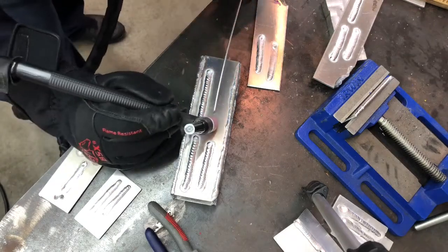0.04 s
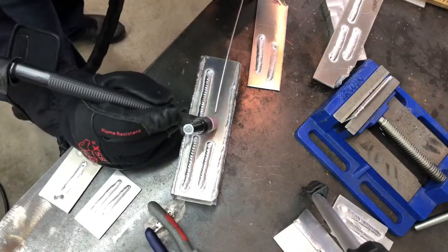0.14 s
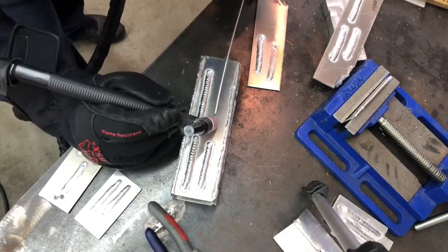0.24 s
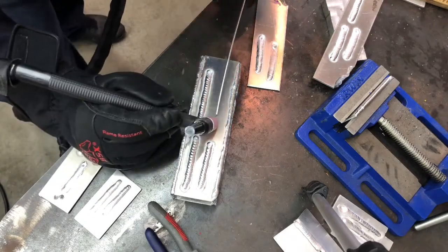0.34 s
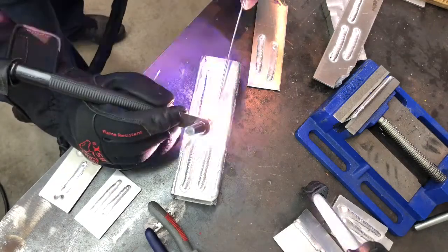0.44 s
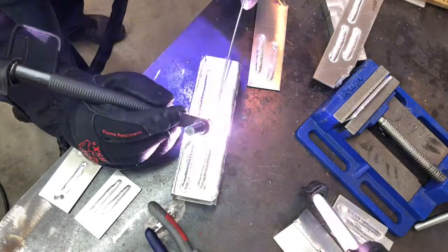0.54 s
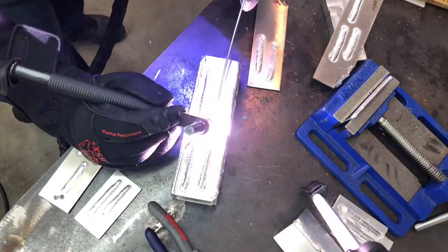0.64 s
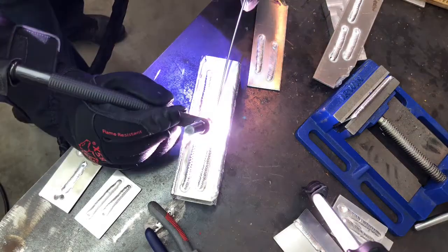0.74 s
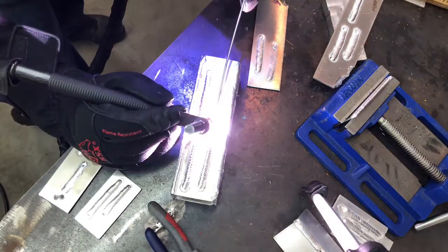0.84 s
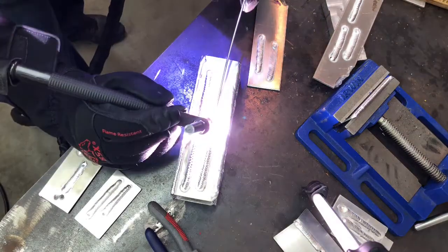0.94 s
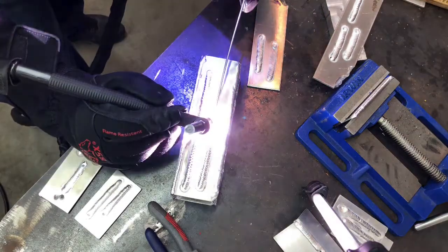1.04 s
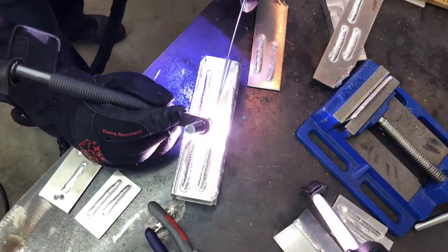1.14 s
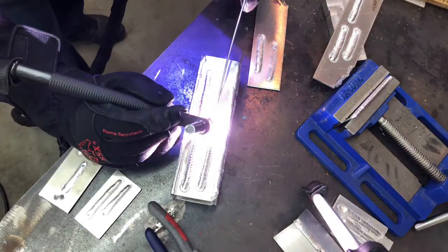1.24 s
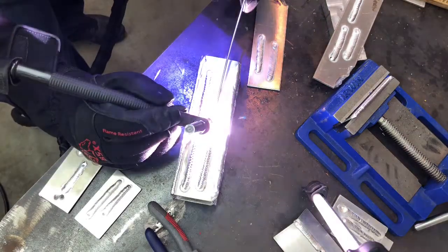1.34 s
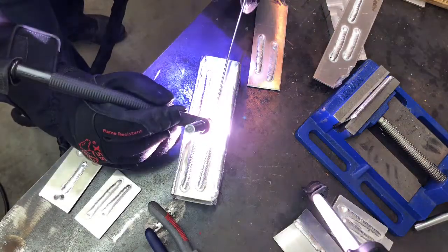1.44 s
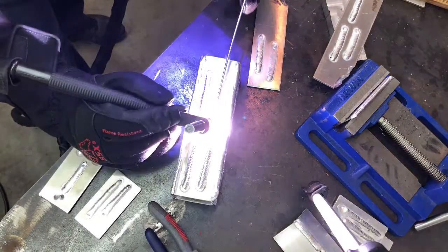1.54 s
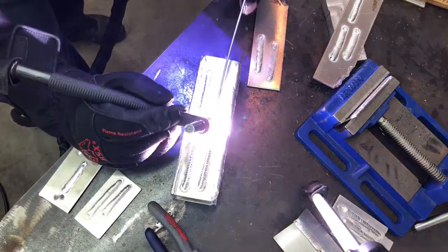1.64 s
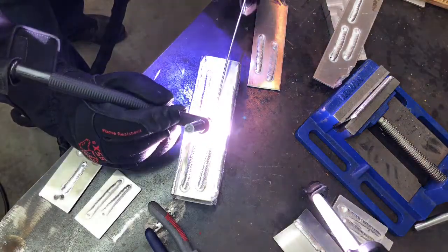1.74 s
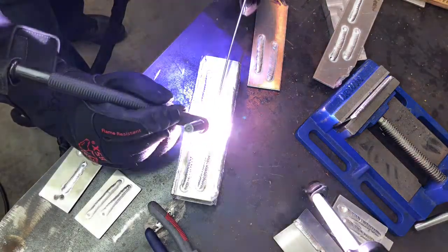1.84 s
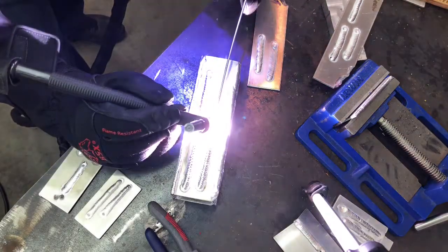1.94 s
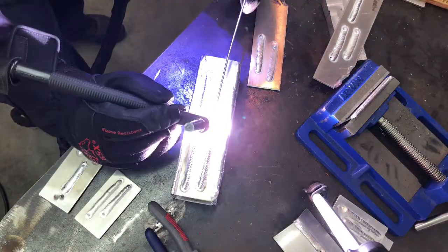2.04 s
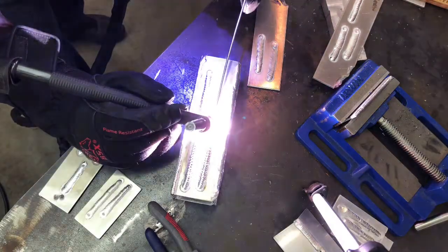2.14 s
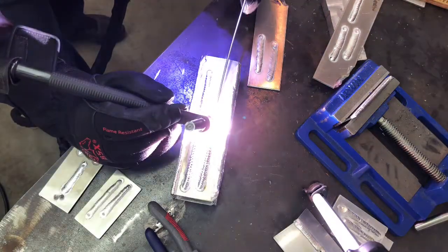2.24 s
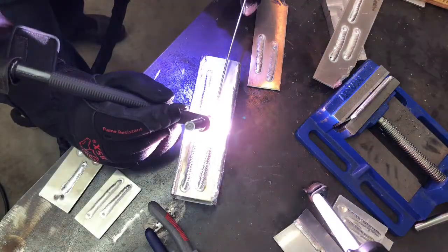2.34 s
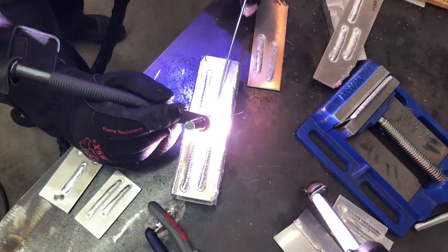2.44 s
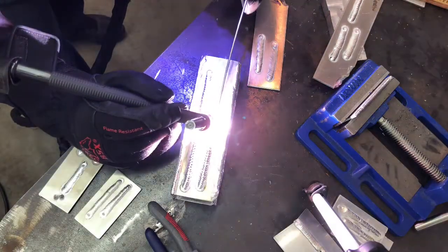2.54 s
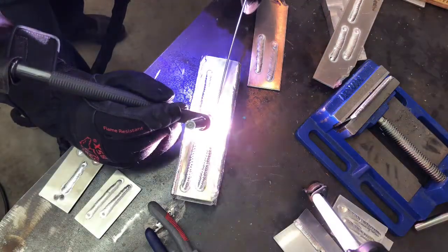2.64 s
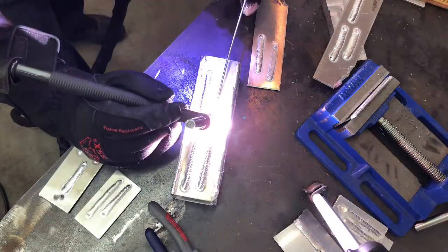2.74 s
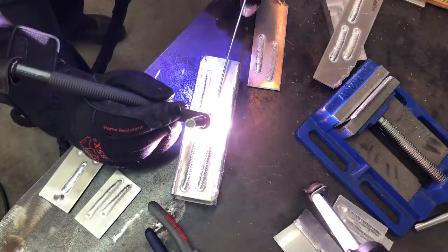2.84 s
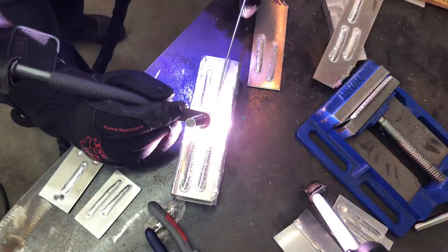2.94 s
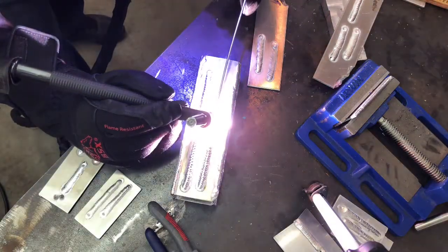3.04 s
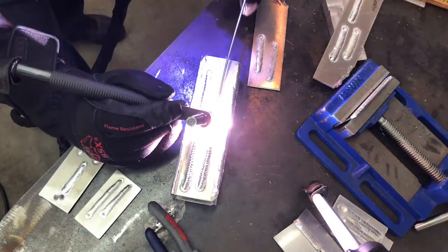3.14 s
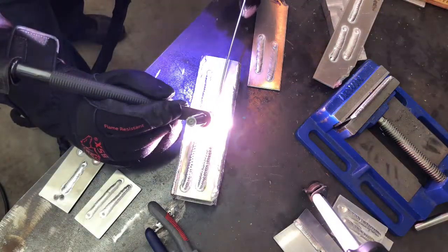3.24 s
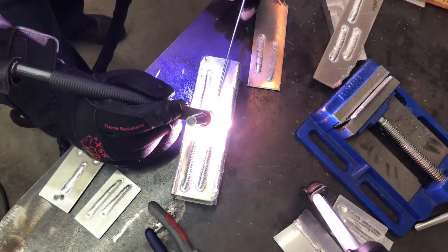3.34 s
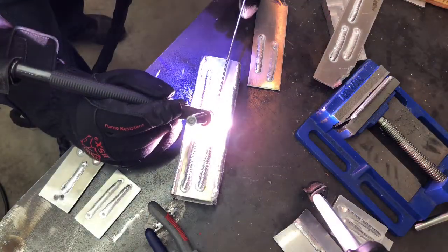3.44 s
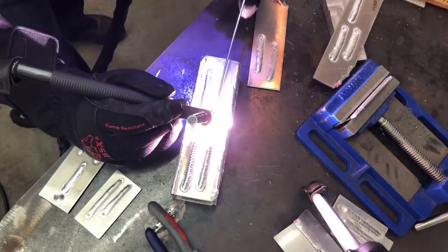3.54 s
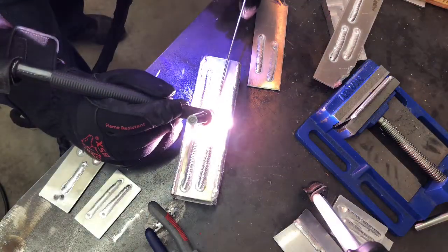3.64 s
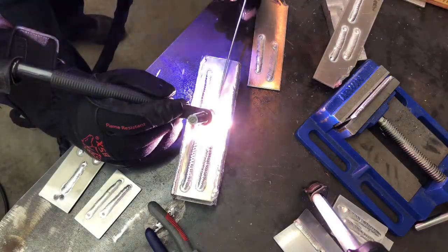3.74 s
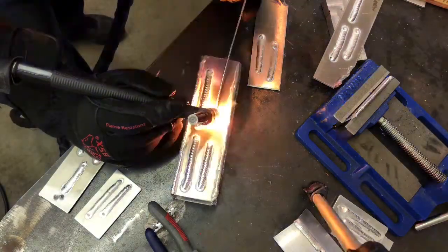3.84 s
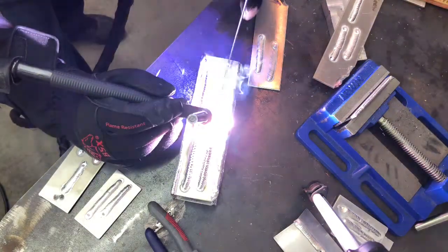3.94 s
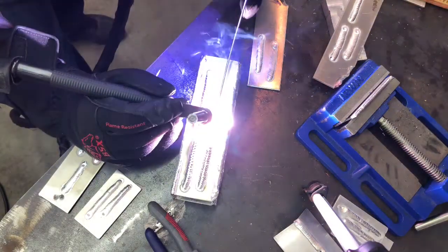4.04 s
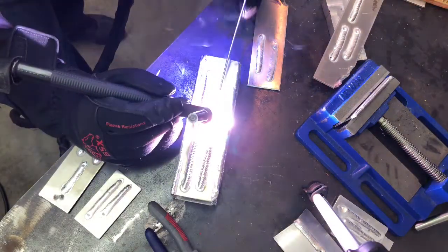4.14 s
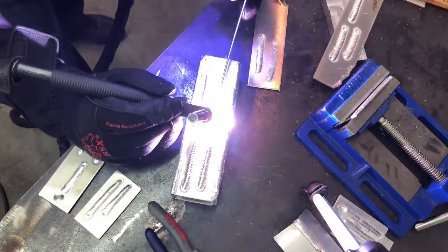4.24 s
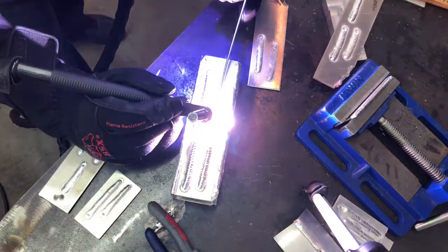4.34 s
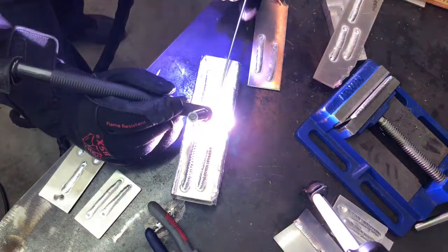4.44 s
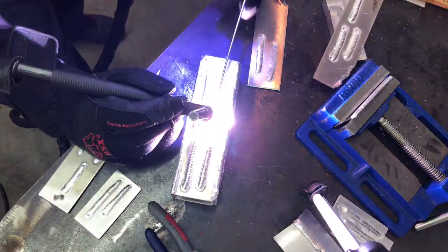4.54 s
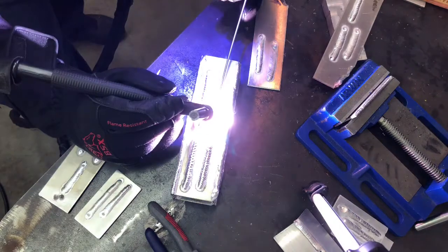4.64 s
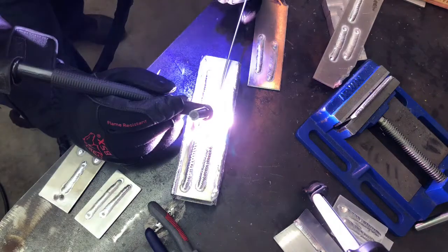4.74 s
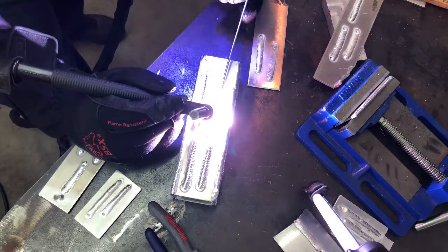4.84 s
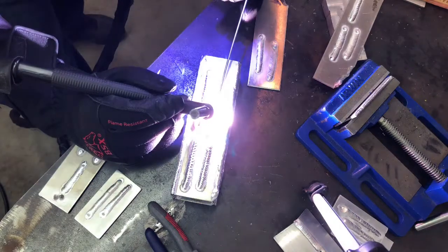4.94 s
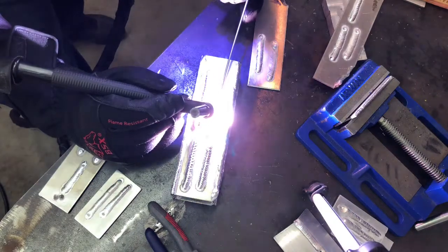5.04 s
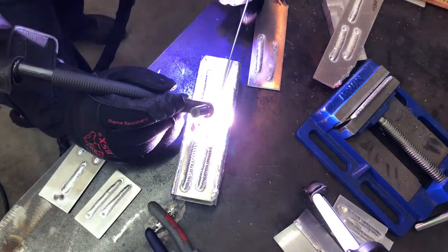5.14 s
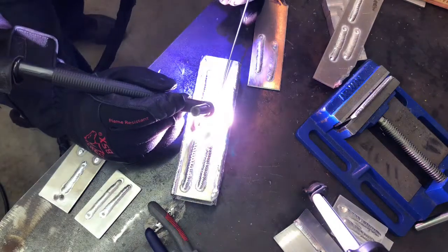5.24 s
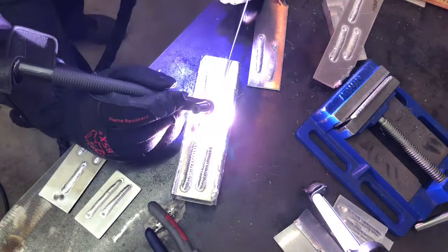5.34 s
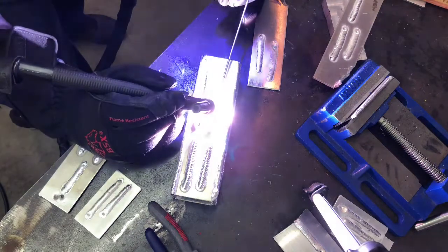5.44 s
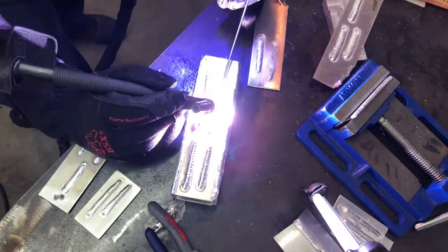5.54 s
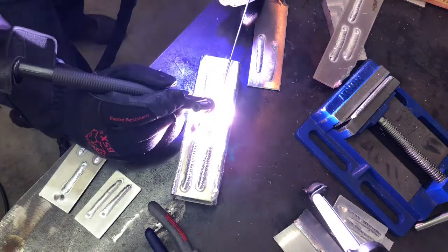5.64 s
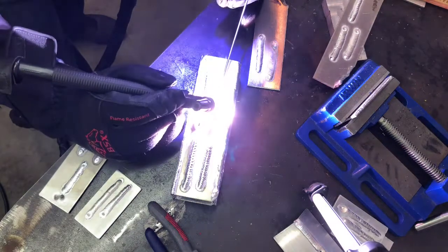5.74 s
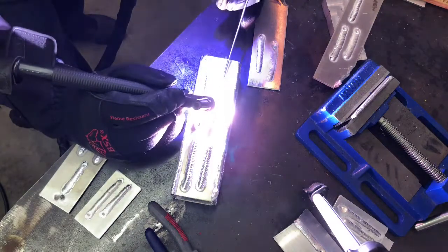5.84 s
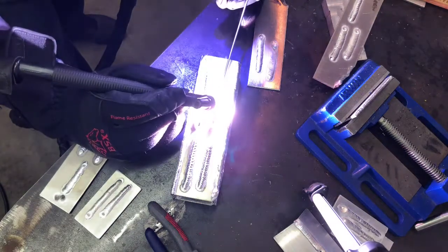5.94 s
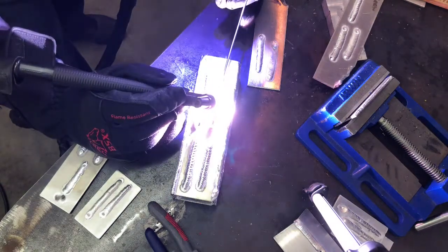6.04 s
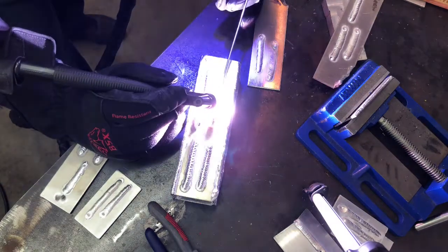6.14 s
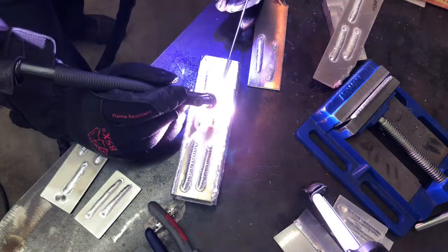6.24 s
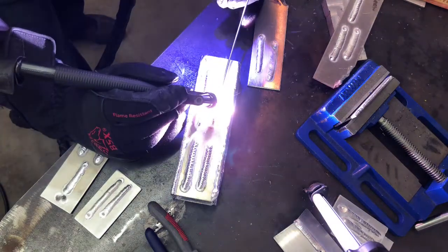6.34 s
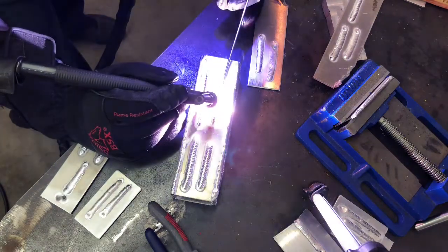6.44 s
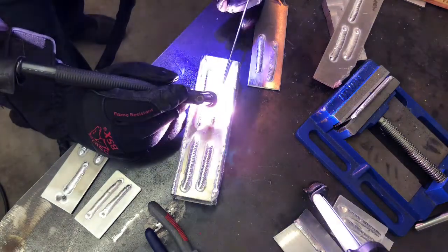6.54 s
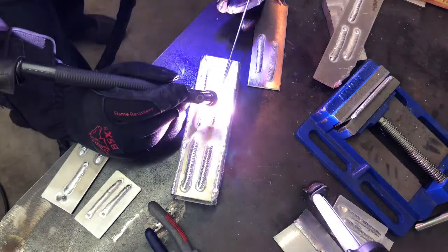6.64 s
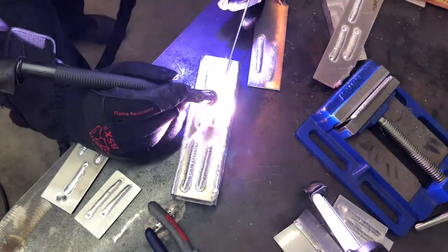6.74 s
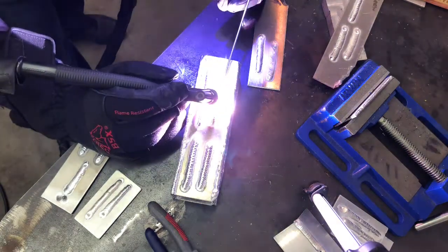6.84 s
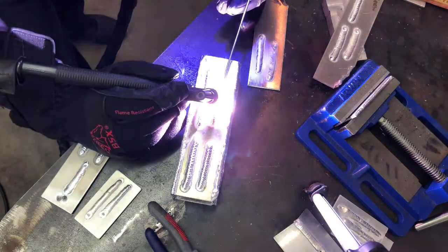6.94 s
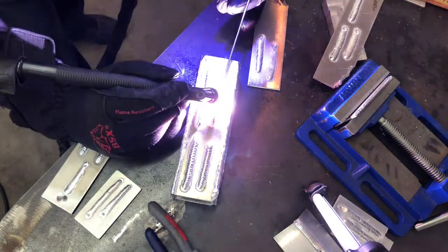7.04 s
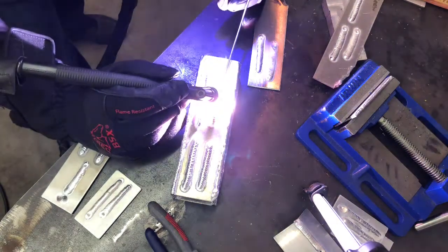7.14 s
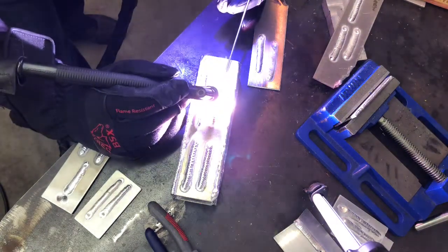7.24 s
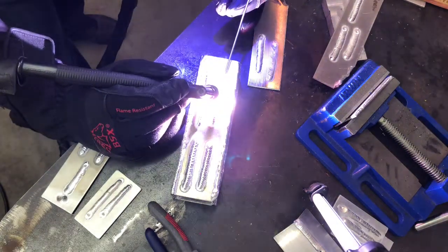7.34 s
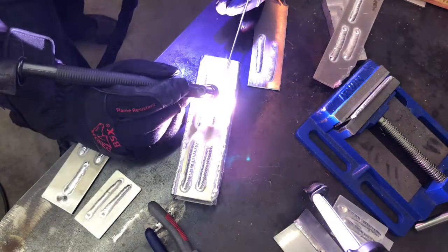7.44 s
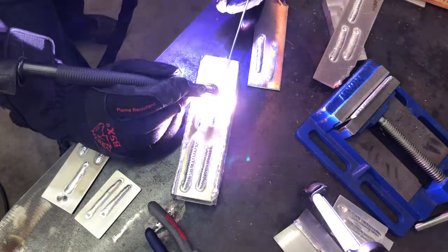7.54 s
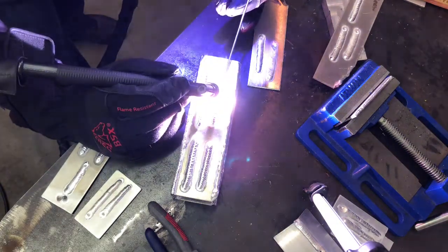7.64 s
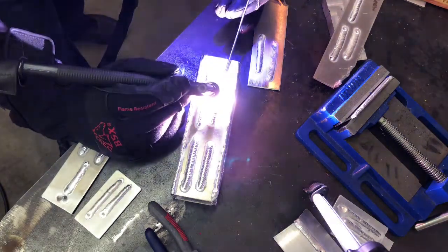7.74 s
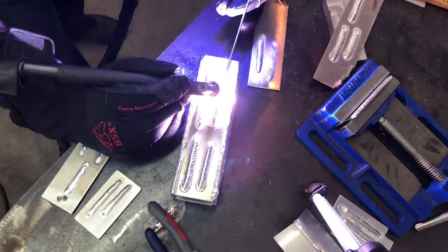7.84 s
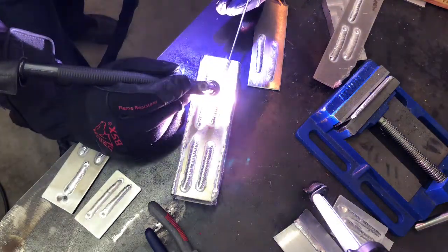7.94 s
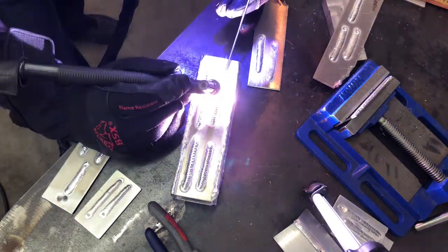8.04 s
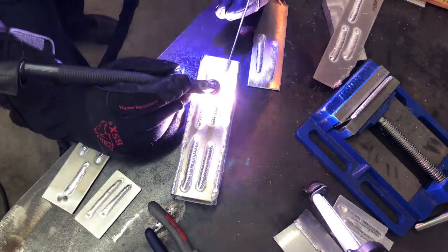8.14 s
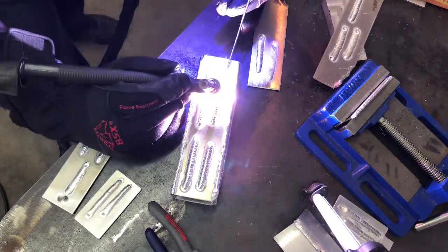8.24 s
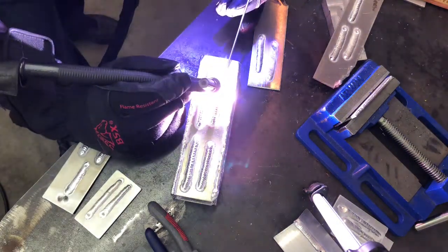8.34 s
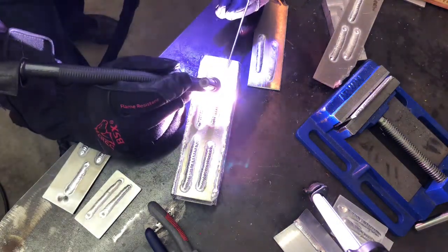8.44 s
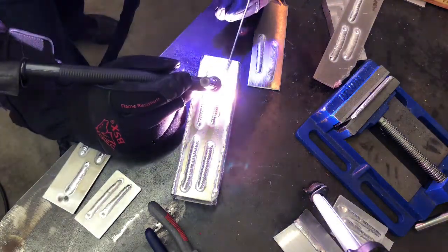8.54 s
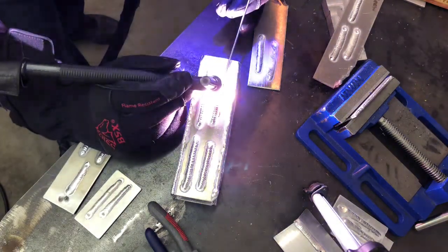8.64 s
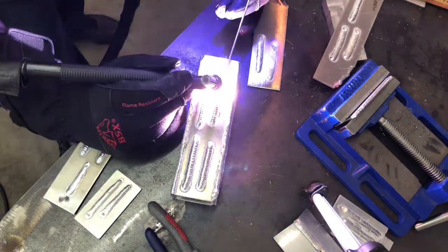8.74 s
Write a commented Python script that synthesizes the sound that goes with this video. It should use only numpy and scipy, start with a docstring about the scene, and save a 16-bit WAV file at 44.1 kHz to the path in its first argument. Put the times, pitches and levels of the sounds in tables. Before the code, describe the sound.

In a workshop, a faint fan whine and room murmur come first, with one tiny spark tick. A short hissing sizzle leaps into a loud, bright, rasping alternating-current welding buzz, which continues to the end. Low gusts of shielding gas or air bump and rush at the close microphone, strongest around the middle. Once, the buzz drops out for a blink and returns.

```python
"""A workshop with a fan whining in the background; at 0.2 s one faint spark, then the sizzle of a starting arc.
From about 0.56 s an alternating-current welding arc on aluminium buzzes steadily on a steel bench:
each reversal of its square-wave current snaps, and the bench and the things on it scatter the snaps.
From about 1.5 s, gusts rumble and rush at the microphone; near 3.9 s the buzz dips briefly.
Arc: a changing set of harmonics plus hiss. Sizzle, gusts, room: coloured noise. Fan: steady sine tones."""
import sys
import numpy as np
from scipy import signal
from scipy.fft import rfft, irfft, next_fast_len
from scipy.io import wavfile
from scipy.ndimage import uniform_filter1d, map_coordinates

SR = 44100
rng = np.random.default_rng(int(sys.argv[2]) if len(sys.argv) > 2 else 0)


def dump_mix(stems):
    """Bounce the given channels to the path in sys.argv[1] as a 16-bit WAV at rate SR."""
    frames = np.atleast_2d(stems).T  # one column per channel
    limited = np.clip(frames, -1, 1)  # hard clip at full scale
    pcm = np.round(limited * 32767).astype(np.int16)
    wavfile.write(sys.argv[1], SR, pcm)


N = 387198


def gain_of(db):
    """Decibels to an amplitude factor."""
    return 10 ** (np.asarray(db) / 20)


def evened(x):
    """Scales to rms 1."""
    return x / np.sqrt(np.mean(abs(x) ** 2) + 1e-20)


def read(points, hz):
    """Reads a table of (f, value) on a log-frequency axis."""
    f, value = np.transpose(points)
    return np.interp(np.log(hz + 1), np.log(f + 1), value)


def follow(rows, column=1):
    """One column of dB over time as a gain for every sample, inaudible outside the table."""
    rows = np.transpose(rows)
    t = np.arange(N) / SR
    return gain_of(np.interp(t, rows[0], rows[column], left=-150, right=-150))


def noise(colour_db):
    """Noise of rms 1 whose spectrum follows the function colour_db(Hz)."""
    size = next_fast_len(N)
    spectrum = rfft(rng.standard_normal(size))
    colour = gain_of(colour_db(np.fft.rfftfreq(size, 1 / SR)))
    return evened(irfft(spectrum * colour, size)[:N])


def wander(rate_hz):
    """Slow random signal of rms 1 whose spectrum falls away around and above rate_hz."""
    return noise(lambda f: -40 * np.log10(1 + f / rate_hz))


def scatter(steps, orders, drift_s):
    """Random complex transfer of many near reflections per harmonic, drifting as the torch travels."""
    a, b = rng.standard_normal((steps, orders, 2)).T
    span = max(round(drift_s * steps / (N / SR)), 1)
    # smoothed twice over time
    real = uniform_filter1d(uniform_filter1d(a, span), span)
    imaginary = uniform_filter1d(uniform_filter1d(b, span), span)
    return evened(real + 1j * imaginary)


ARC_HZ = 119.875  # current cycles per second
BALANCE_SHARE = .2495  # part of each cycle spent in reverse polarity
# times at which the torch passes the early, middle and late places on the seam: t/s
SEAM_TIMES = [1.3, 4.6, 7.8]
# colour of the snaps early and late on the seam: f/Hz, relative level/dB
SEAM_START = [(5000, -1), (6000, 0), (7000, 4), (8500, 1), (10000, 0.5), (11500, 5), (13000, 1.5),
              (14500, 1), (15700, 0.5)]
SEAM_END = [(5000, -6.5), (6000, -1), (7000, -2.5), (8500, 0.5), (10000, 1), (11500, 4), (13000, -1),
            (14500, 2), (15700, -0.5)]
# lower harmonics at the three places: multiple of the arc frequency, relative level/dB
LOW_EARLY = [(1, -21), (2, -13.5), (3, -4.5), (4, -3), (5, -20.5), (6, -27), (7, -3.5), (8, -6.5), (9, -18),
             (10, -10.5), (11, -4), (12, -13), (13, 0), (14, -2), (15, -2), (16, -16), (17, -4), (18, 1.5),
             (19, -2.5), (20, -6), (21, -2), (22, 0.5), (23, -0.5), (24, -37), (25, 1), (26, 1.5), (27, 2),
             (28, -32), (29, -3), (30, -7), (31, -7), (32, 4), (33, -10), (34, 2.5), (35, 0), (36, -37),
             (37, -5), (38, -3), (39, -2)]
LOW_MIDDLE = [(1, -8), (2, -10.5), (3, -6.5), (4, -5.5), (5, -21), (6, -19), (7, -5), (8, -10), (9, -14),
              (10, -15.5), (11, -8.5), (12, -14), (13, -3), (14, -7.5), (15, -3.5), (16, -21), (17, -8),
              (18, -0.5), (19, -7), (20, -18), (21, -5), (22, 2.5), (23, -4), (24, -19), (25, -6),
              (26, -6.5), (27, -1), (28, -10), (29, -7), (30, -1.5), (31, -9), (32, -1.5), (33, -11.5),
              (34, -1), (35, 2.5), (36, -7), (37, -19), (38, -3), (39, -5)]
LOW_LATE = [(1, -17), (2, -19), (3, -10.5), (4, -9.5), (5, -38), (6, -21), (7, -9), (8, -10), (9, -13),
            (10, -38), (11, -6), (12, -14), (13, 1.5), (14, -3.5), (15, -2), (16, -13), (17, -3), (18, 2),
            (19, -2.5), (20, -8), (21, -0.5), (22, 2.5), (23, 1), (24, -33), (25, -7), (26, 0), (27, -0.5),
            (28, -19), (29, -8), (30, 2.5), (31, 0), (32, -25), (33, -2), (34, 3.5), (35, -2), (36, -14),
            (37, 5.5), (38, 4), (39, -2)]
# how much of a cycle the echoes of a snap fill: f/Hz, share of a cycle
SMEAR = [(700, 0.96), (2500, 0.67), (5000, 0.72), (15700, 1)]
# brief dip of the buzz: t/s, level/dB
DIP = [(3.868, -1), (3.885, -6), (3.897, -18), (3.93, -19), (3.945, -6), (3.965, -1)]
LOW_DIPS = 0.4  # share of the dip, in dB, felt by the fundamental and harmonics 2-5
# colour of the steady hiss of the arc: f/Hz, relative level/dB per Hz
ARC_HISS = [(300, -32), (1000, -2), (2000, 7), (4000, 8), (5500, 4.5), (8000, 9), (11000, 4.5), (13500, -8),
            (15700, -25)]
SHOULDER_HZ, SHOULDER_WIDTH_HZ, SHOULDER_DB = 15, 17, -23.5  # faint fuzz just above harmonics 2 and up
FRAY, FRAY_HZ = 0.027, 120  # quick random flicker that frays every harmonic by its own strength


def arc(second_snap=0.87, blur_hz=30000, unlike=0.25, scattered=0.14, settle_hz=6000, drift_s=.8,
        shimmer=0.28, shimmer_s=.1, flutter_db=.5, jitter_s=2.5e-6, hiss_dips=0.21, hiss_throb=0.25):
    """One cycle of snaps is built for each place on the seam and read at the frequency of the current."""
    steps, size, k = 180, 4096, np.arange(1, 132)  # moments, samples in a cycle, harmonic numbers
    when, hz = np.linspace(0, N / SR, steps), k * ARC_HZ
    late = np.interp(when, SEAM_TIMES[::2], [0, 1])
    colour_db = np.outer(read(SEAM_START, hz), 1 - late) + np.outer(read(SEAM_END, hz), late)

    # two snaps of opposite sign a quarter cycle apart weaken every fourth harmonic; the second is duller
    second = second_snap * np.exp(-hz / blur_hz - 2j * np.pi * k * BALANCE_SHARE)
    snaps = (1 - second)[:, None] + unlike * scatter(steps, len(k), drift_s)
    lines = gain_of(colour_db) * snaps / 2
    # the lower harmonics take their strengths from the tables instead
    low_db = np.array([LOW_EARLY, LOW_MIDDLE, LOW_LATE])[:, :, 1].T
    lines[:len(low_db)] = gain_of([np.interp(when, SEAM_TIMES, db) for db in low_db])
    lines *= gain_of(band_changes(when, hz))

    # reflections smear each snap over much of the cycle
    smear_turns = np.cumsum(read(SMEAR, hz) * (rng.random(len(k)) - .5))
    lines *= np.exp(-2j * np.pi * smear_turns)[:, None]
    # short waves feel the moves of torch and hot air most
    moves = scattered * scatter(steps, len(k), drift_s) + shimmer * scatter(steps, len(k), shimmer_s)
    sensitivity = hz ** 2 / (hz ** 2 + settle_hz ** 2)
    lines *= 1 + sensitivity[:, None] * moves

    t = np.arange(N) / SR
    turns = ARC_HZ * (t + jitter_s * wander(60))
    place = [np.linspace(0, steps - 1, N), turns % 1 * size]
    treble, middle, low, hum, fizz = buzz_levels(t)
    dip_db = np.interp(t, *np.transpose(DIP))
    treble, middle = gain_of(dip_db) * [treble, middle]
    low, hum = gain_of(LOW_DIPS * dip_db) * [low, hum]

    buzz = np.zeros(N)
    for part, level in ((k > 39, treble), ((k > 5) & (k <= 39), middle), ((k > 1) & (k <= 5), low)):
        cycles = irfft(np.pad((lines * part[:, None]).T, ((0, 0), (1, 0))), size)
        cycles = np.column_stack([cycles, cycles[:, 0]])  # close the loop
        cycles /= cycles.std(1, keepdims=True)
        buzz += map_coordinates(cycles, place, order=1) * level

    fuzz = wander(SHOULDER_WIDTH_HZ) + 1j * wander(SHOULDER_WIDTH_HZ)
    fuzz = evened(fuzz * np.exp(2j * np.pi * SHOULDER_HZ * t))
    buzz += gain_of(SHOULDER_DB) * (signal.hilbert(buzz, next_fast_len(N))[:N] * fuzz).real
    buzz += np.sqrt(2) * np.sin(2 * np.pi * turns) * hum
    flicker = gain_of(flutter_db * wander(27)) + FRAY * wander(FRAY_HZ)

    # the hiss throbs once a cycle and feels little of the dip
    hiss = noise(lambda f: read(ARC_HISS, f)) * fizz * (1 + hiss_throb * np.cos(2 * np.pi * turns))
    return buzz * flicker + hiss * gain_of(hiss_dips * dip_db)


# narrow bands, sliding or still, that grow weaker or stronger for a while:
# from t/s, to t/s, from f/Hz, to f/Hz, half-width/Hz (where the dB shrink to 1/e), level/dB
BAND_CHANGES = [(.5, 1.2, 4300, 4500, 150, -5), (1.8, 3.6, 3830, 3830, 70, -10),
                (1.3, 8.8, 5000, 6200, 250, -7), (6.2, 8.8, 6500, 7200, 200, -9),
                (4.3, 5.2, 7900, 7950, 100, -12), (.7, 3.4, 9050, 9900, 150, -8),
                (.6, 2.9, 10050, 10700, 150, -12), (3.3, 7.3, 12000, 12900, 180, -9),
                (7.5, 8.8, 12300, 12500, 150, -10), (2.5, 5.3, 13150, 13000, 180, -9),
                (3.1, 5.3, 13300, 13700, 200, -10), (6.8, 8.1, 13300, 13000, 300, -9),
                (1.9, 2.9, 13900, 13900, 150, -12), (1.1, 2.8, 14100, 14800, 200, -12),
                (1.8, 3.6, 3960, 3960, 70, 10), (5.3, 8.8, 8500, 8900, 200, 4),
                (4.1, 7.5, 9000, 9700, 250, 4), (5.3, 7.4, 12000, 12200, 200, 5),
                (7.4, 8.8, 13600, 14300, 400, 5), (3, 7, 14800, 15400, 500, 6)]


def band_changes(when, hz, fade_s=0.63):
    """Narrow bands of the buzz weaken or strengthen for a while: their sum in dB, harmonics by moments."""
    out = np.zeros((len(hz), len(when)))
    for t0, t1, hz0, hz1, width, db in BAND_CHANGES:
        centre = np.interp(when, [t0, t1], [hz0, hz1])
        present = np.clip(np.minimum(when - t0, t1 - when) / fade_s + .5, 0, 1)
        out += db * present * np.exp(-((hz[:, None] - centre) / width) ** 2)
    return out


# middle harmonics before and after the dip; their quick swells move the whole buzz: t/s, level/dB
BUZZ = [
    [(0.6, -28), (0.86, -28), (1.66, -26), (1.8, -29), (1.88, -26), (2.02, -30), (2.25, -26), (2.35, -29),
     (2.48, -25), (2.52, -29), (2.92, -26.5), (3.08, -30.5), (3.16, -26.5), (3.25, -30), (3.34, -25),
     (3.51, -29.5), (3.7, -28), (3.75, -30.5), (3.79, -26), (3.86, -28.5)],
    [(3.97, -28), (4.0, -25.5), (4.08, -29.5), (4.18, -29), (5.19, -27.5), (5.26, -25), (5.32, -28),
     (5.51, -26), (5.71, -29), (5.76, -27.5), (6.17, -28.5), (6.22, -25.5), (6.39, -29), (6.65, -25),
     (6.77, -28.5), (7.05, -24.5), (7.06, -30.5), (7.12, -24.5), (7.24, -29), (7.39, -25.5), (7.44, -28),
     (7.59, -25.5), (7.68, -29), (7.75, -24), (7.81, -29.5), (7.96, -27), (7.99, -23.5), (8.04, -26),
     (8.42, -28), (8.55, -24.5), (8.62, -29.5), (8.65, -26), (8.67, -31), (8.78, -28.5)],
]
# slow levels, before the swells, as the arc warms and travels:
# t/s, treble/dB, harmonics 2-5/dB, fundamental/dB, hiss relative to the treble/dB
SETTLING = [(.53, -20.5, -48, -89, -16), (1.03, -20.5, -46, -62, -22), (1.3, -20, -41, -65, -19),
            (1.85, -21, -43.5, -64, -18.5), (2.0, -21.5, -41, -53.5, -15.5), (3.1, -21.5, -43, -52, -15),
            (4.0, -21, -41, -51, -15), (5.2, -21.5, -41.5, -52, -16.5), (6.4, -21, -42.5, -53, -18.5),
            (6.6, -21, -41, -58.5, -17), (8.78, -22, -43, -58, -14)]
CATCH_S, CATCH_DB_PER_S = 0.557, 900  # the buzz climbs to full level at this moment
SWELL_S = 0.63  # changes quicker than this count as swells
TREBLE_SWELL, LOW_SWELL, HUM_SWELL = 0.38, 1, -4  # dB per dB of swell; the fundamental sinks as the buzz swells
HUM_TOP_DB = 6.5  # the fundamental rises no more than this over its slow level


def buzz_levels(t, hum_waver_db=2.0, hum_waver_hz=5):
    """Gains of treble, middle harmonics, harmonics 2-5, fundamental and hiss, all moved by one swell."""
    middle_db = np.interp(t, *np.vstack(BUZZ).T)
    swell_db = middle_db - uniform_filter1d(middle_db, round(SWELL_S * SR))
    when, *slow = np.transpose(SETTLING)
    treble_db, low_db, hum_db, hiss_db = (np.interp(t, when, db) for db in slow)
    treble_db = treble_db + TREBLE_SWELL * swell_db
    hum_move_db = HUM_SWELL * swell_db + hum_waver_db * wander(hum_waver_hz)
    hum_db = hum_db + np.minimum(hum_move_db, HUM_TOP_DB)
    levels = [treble_db, middle_db, low_db + LOW_SWELL * swell_db, hum_db, treble_db + hiss_db]
    return gain_of(levels + np.minimum(t - CATCH_S, 0) * CATCH_DB_PER_S)


# sizzle before the arc settles: t/s, upper part level/dB, lower part level/dB
STRIKE = [(.34, -78, -78), (.385, -45, -40), (.41, -40, -42.5), (.455, -36, -42.5), (.475, -30, -31),
          (.49, -26.5, -31.5), (.51, -34, -38.5), (.55, -26, -38), (.6, -50, -64)]
# colour of the sizzle: f/Hz, relative level/dB per Hz
STRIKE_COLOUR = [(200, -7.5), (500, -10), (1200, -8), (2500, -2), (3300, -3), (3800, 2.5), (4300, -5),
                 (5000, -7), (7000, -7.5), (9000, -7), (10500, -8), (11100, -1), (11900, -7), (13500, -9),
                 (15700, -11.5)]
SPARK_S, SPARK_UPPER_DB, SPARK_LOWER_DB = .212, -57.5, -68  # peak of one faint early spark
SPARK_RISE_DB_PER_S, SPARK_FALL_DB_PER_S = 550, 330


def strike(split_hz=5500, grain_db=0.5, grain_hz=300):
    """Sizzle of the starting spark: noise whose upper and lower parts swell separately."""
    upper = noise(lambda f: read(STRIKE_COLOUR, f) - 60 * (f < split_hz))
    lower = noise(lambda f: read(STRIKE_COLOUR, f) - 60 * (f > split_hz))
    since = np.arange(N) / SR - SPARK_S
    spark = gain_of(np.minimum(SPARK_RISE_DB_PER_S * since, -SPARK_FALL_DB_PER_S * since))
    upper = upper * (follow(STRIKE) + gain_of(SPARK_UPPER_DB) * spark)
    lower = lower * (follow(STRIKE, column=2) + gain_of(SPARK_LOWER_DB) * spark)
    return (upper + lower) * gain_of(grain_db * wander(grain_hz))


# colours of the moving air at the microphone: f/Hz, relative level/dB per Hz
RUMBLE = [(20, -26), (40, -8.5), (70, 0.5), (110, -4), (170, -9), (300, -9), (600, -31)]
RUSH = [(100, -10), (200, -3), (400, -3.5), (650, -3.5), (1300, -7.5), (2000, -10.5), (3000, -40)]
# continuous air, rush before the lift of rush_db: t/s, rumble level/dB, rush level/dB
WIND = [(0.6, -75, -70), (1.65, -79, -67), (2.12, -53, -60), (2.63, -54, -60.5), (3.74, -53, -60),
        (3.86, -67.5, -60), (5.02, -56, -57), (5.25, -52, -64), (7.09, -65, -58), (7.3, -59.5, -62.5),
        (7.89, -62, -59.5), (8.78, -64, -60)]
# single gusts, rush before the same lift: middle t/s, rumble level/dB, rush level/dB, half-length/s
GUSTS = [(1.52, -58, -66, .06), (1.79, -47, -64, 0.056), (1.973, -47, -65, .06), (2.16, -47, -53, 0.055),
         (2.467, -45, -56, 0.043), (2.785, -46, -65, 0.094), (2.89, -44, -52, 0.051), (3.3, -49, -62, .08),
         (3.404, -43, -60, 0.032), (3.461, -45, -60, .04), (3.66, -49, -58, .08),
         (3.757, -45, -51.5, 0.037), (3.87, -45, -56, 0.063), (4.064, -35.5, -43, 0.045),
         (4.18, -40, -48, 0.13), (4.235, -51, -53, 0.055), (4.336, -47, -60, 0.036),
         (4.385, -55, -53, 0.045), (4.542, -43, -50.5, 0.094), (4.6, -50, -53, .06),
         (4.752, -33.5, -44, 0.064), (4.909, -30, -51, .04), (4.92, -39, -49, .14), (5.03, -50, -55, 0.042),
         (5.12, -50, -49, 0.13), (5.298, -51, -60, 0.045), (5.64, -55, -49, 0.054),
         (5.755, -62, -54, 0.063), (5.874, -50, -54, .05), (6.432, -46, -53, 0.096), (6.754, -49, -61, .08),
         (7.243, -46, -61, 0.054), (7.814, -51, -62, .07), (8.143, -55, -61, 0.076),
         (8.41, -50, -67, 0.093), (8.71, -39, -55, 0.042)]


def gusts(lumpy_db=2.5, lumps_hz=30, rush_db=8.0, puffy_db=4.5, puffs_hz=7):
    """Moving air at the microphone: lumpy low rumble and a lighter rush, with single gusts on top."""
    lumps = gain_of(lumpy_db * wander(lumps_hz))
    rumble = noise(lambda f: read(RUMBLE, f) - 80 * (f > 1500))
    rush = noise(lambda f: read(RUSH, f) - 60 * (f > 3300)) * gain_of(rush_db) * lumps
    puffs = gain_of(puffy_db * wander(puffs_hz))
    out = rumble * lumps * follow(WIND) * puffs + rush * follow(WIND, column=2)
    # single gusts take their air from the same noises, backwards
    for middle_s, gust_rumble_db, gust_rush_db, half_s in GUSTS:
        swell = np.hanning(2 * round(half_s * SR))
        start = round((middle_s - half_s) * SR)
        at = slice(start, start + len(swell))
        thump = rumble[::-1][at] * swell
        # each thump is brought to the same strength before its level
        thump = thump / np.linalg.norm(thump) * np.linalg.norm(swell)
        out[at] += gain_of(gust_rumble_db) * thump
        out[at] += gain_of(gust_rush_db) * rush[::-1][at] * swell
    return out


# colour of the room murmur: f/Hz, relative level/dB per Hz
SHOP = [(15, -48), (25, -24), (64, -23.5), (174, -15.5), (391, -18), (526, -22), (618, -34), (688, -15),
        (767, -26), (1180, -23.5), (15700, -56)]
SHOP_DB = -57  # murmur before the sinks
# fan tones before the sinks: f/Hz, level/dB
FAN = [(59.2, -62), (301.5, -64.5), (344.5, -70.5), (387.6, -62), (602.9, -66), (694.4, -48.5),
       (1039, -70.5), (1211, -74)]
# fan and murmur sink under the arc: t/s, level/dB
SHOP_SINKS = [(0, 1), (.54, 0), (.62, -17), (1.8, -13), (2.2, -22), (8.78, -26)]


def shop(waver_db=1.0):
    """Background: steady fan tones, wavering together, over the noise murmur of the room."""
    t = np.arange(N) / SR
    tones = np.zeros(N)
    for hz, db in FAN:
        tones += np.sqrt(2) * gain_of(db) * np.sin(2 * np.pi * (hz * t + rng.random()))
    room = gain_of(SHOP_DB) * noise(lambda f: read(SHOP, f))
    return (tones * gain_of(waver_db * wander(4.6)) + room) * follow(SHOP_SINKS)


def scene():
    """All sources summed at one microphone."""
    return (arc() + strike() + gusts() + shop())[None]


def record(dry):
    """A steep low-pass sets the upper band limit."""
    edge = signal.firwin(1023, 15750, window=("kaiser", 9), fs=SR)  # edge in Hz
    return signal.oaconvolve(dry, edge[None], "same")


dry = scene()
out = record(dry)
dump_mix(out)
```